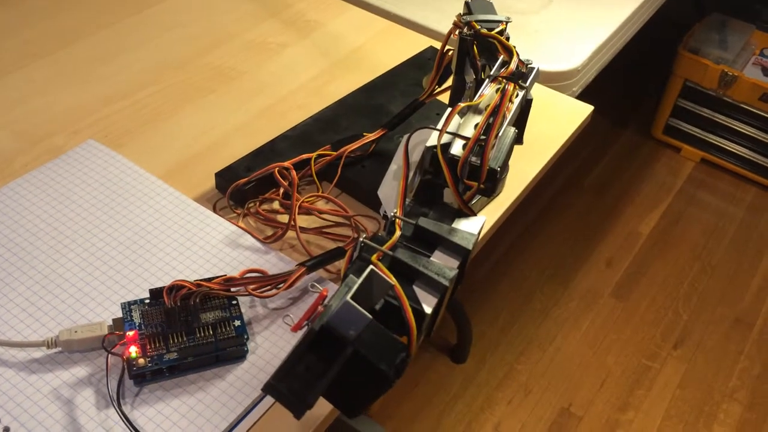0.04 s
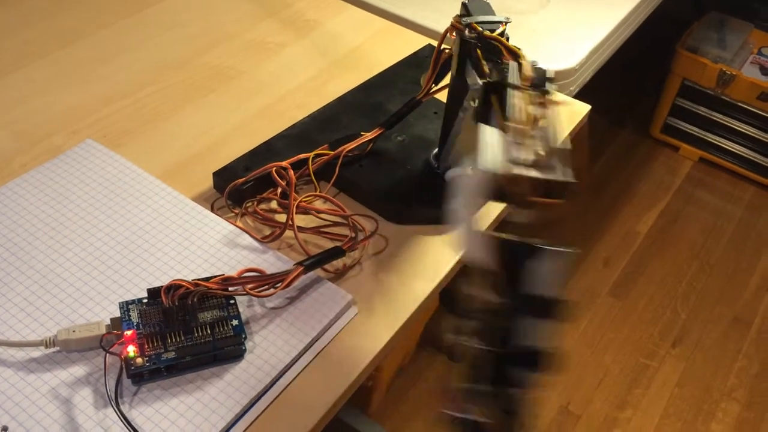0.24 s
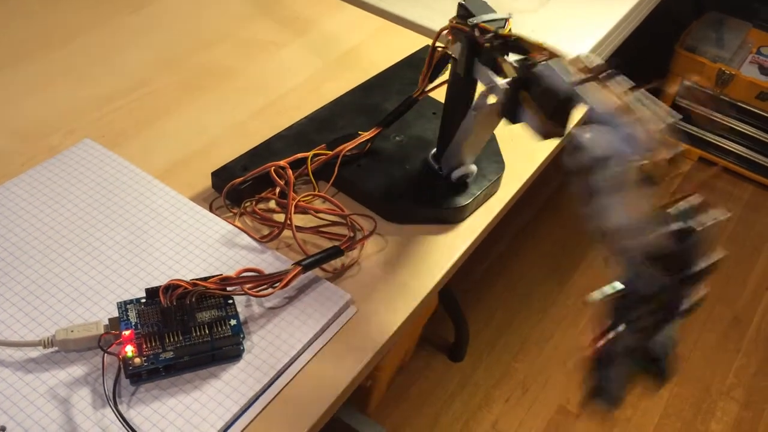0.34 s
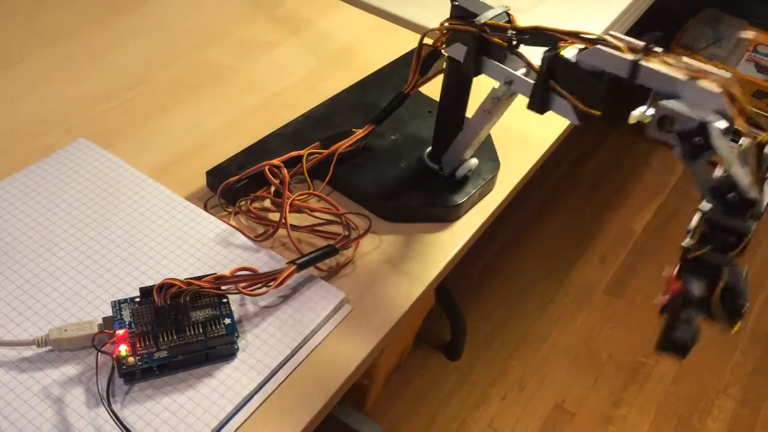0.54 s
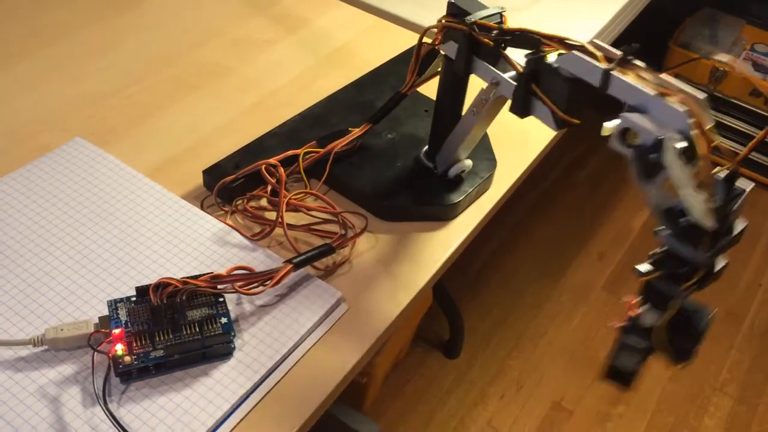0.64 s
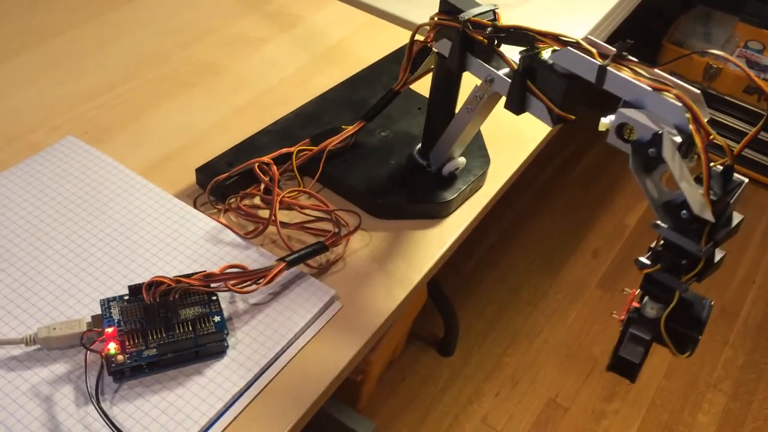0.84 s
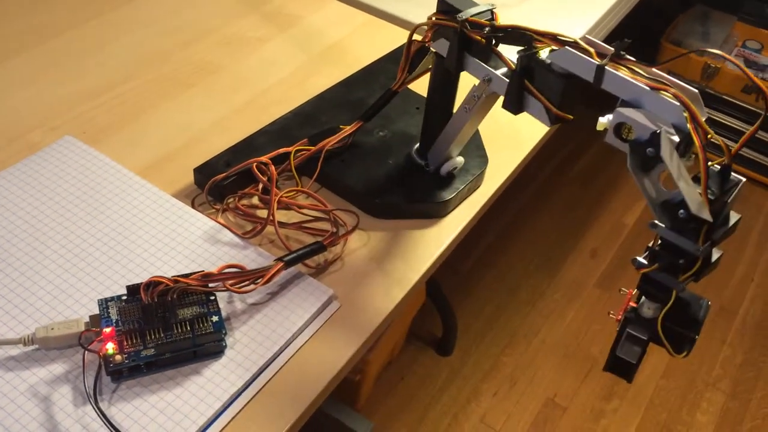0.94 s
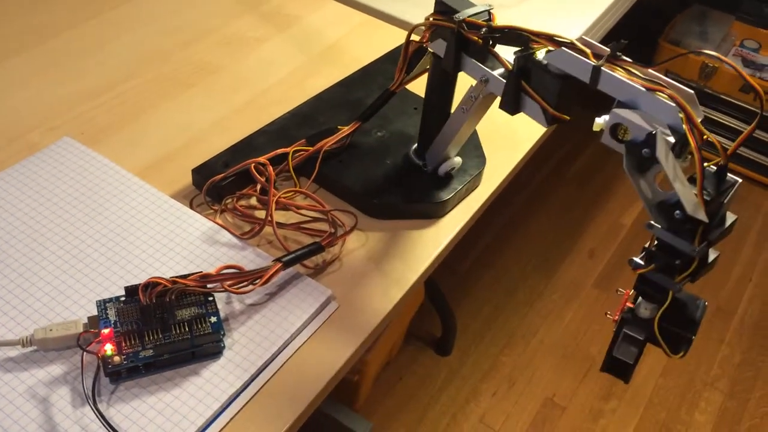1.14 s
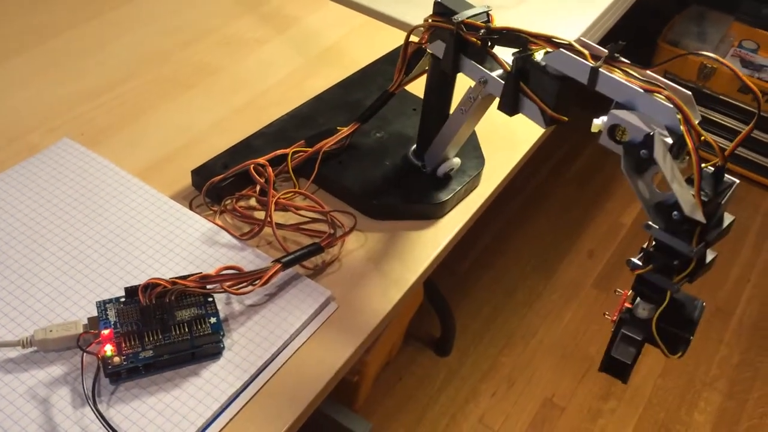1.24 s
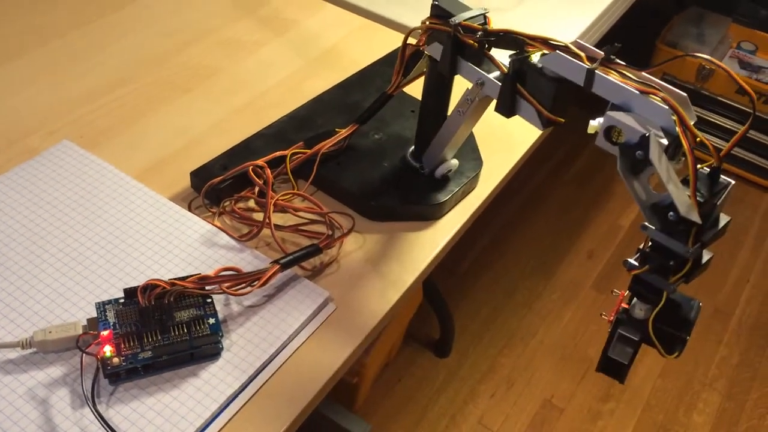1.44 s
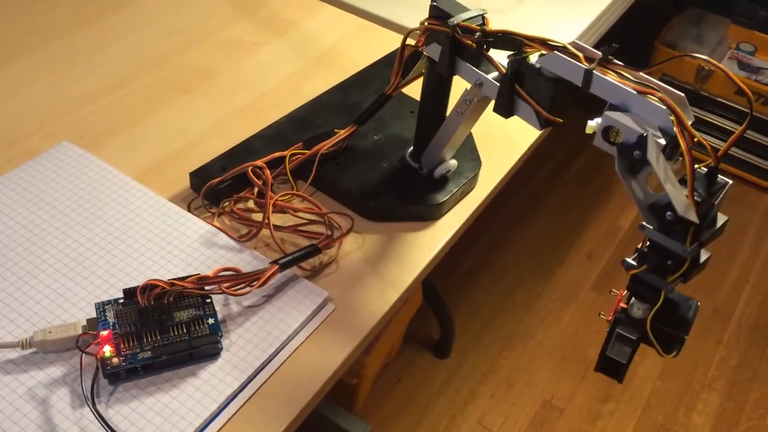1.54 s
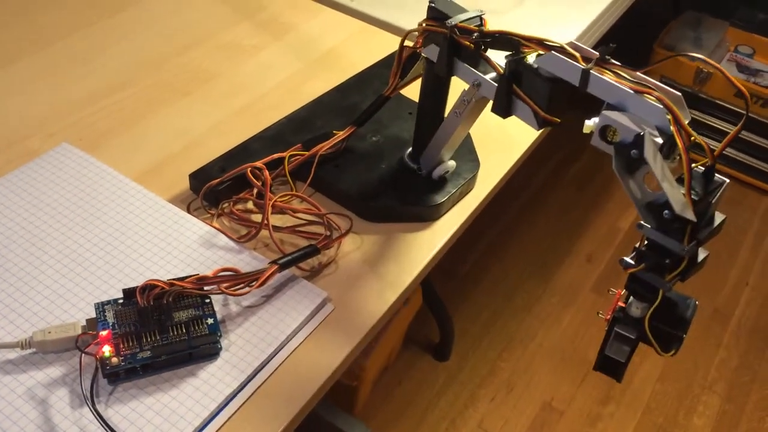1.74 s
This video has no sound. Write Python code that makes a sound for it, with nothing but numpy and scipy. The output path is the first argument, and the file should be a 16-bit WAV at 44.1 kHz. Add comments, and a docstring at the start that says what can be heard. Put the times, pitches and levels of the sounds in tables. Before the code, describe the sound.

A small robot arm's servos whine briefly, then it thuds to a stop and ticks.

```python
"""A faint buzz over two low hums and room hiss, then hobby servos swing a small plastic robot arm.
Gear teeth hiss and whine, slack knocks in the arm and a faster joint chirps up.
The arm stops with a thud through the wooden desk and settles with a few ticks.
The servos then hold their pose, buzzing as each control pulse nudges the motors."""
import sys
import numpy as np
from scipy import signal
from scipy.fft import rfft, irfft, next_fast_len
from scipy.io import wavfile
from scipy.ndimage import uniform_filter1d

SR = 44100
rng = np.random.default_rng(int(sys.argv[2]) if len(sys.argv) > 2 else 0)


def dump_mix(stems):
    """Bounce the given channels to the path in sys.argv[1] as a 16-bit WAV at rate SR."""
    frames = np.atleast_2d(stems).T  # one column per channel
    limited = np.clip(frames, -1, 1)  # hard clip at full scale
    pcm = np.round(limited * 32767).astype(np.int16)
    wavfile.write(sys.argv[1], SR, pcm)


N = 79380
TIME_S = np.arange(N) / SR


def amp(db):
    return 10 ** (np.asarray(db, float) / 20)


def unit_rms(x):
    return x / np.sqrt(np.mean(x ** 2) + 1e-20)


def curve(table, column=1):
    return np.interp(TIME_S, [row[0] for row in table], [row[column] for row in table])


def gate(table):
    return (TIME_S > table[0][0]) * (TIME_S < table[-1][0])


def butter(x, order, hz, kind):
    return signal.sosfilt(signal.butter(order, hz, kind, fs=SR, output="sos"), x)


def coloured(x, spectrum):
    """Filters by (freq_hz, gain_db) points on a log-frequency axis."""
    freq_hz, gain_db = np.transpose(spectrum)
    size = next_fast_len(len(x))
    bin_hz = np.fft.rfftfreq(size, 1 / SR)
    gain = amp(np.interp(np.log(bin_hz + 1), np.log(freq_hz + 1), gain_db))
    return irfft(rfft(x, size) * gain, size)[:len(x)]


def resonate(x, hz, width_hz):
    """Unity-gain resonance; hz may glide."""
    carrier = np.exp(2j * np.pi * np.cumsum(hz * np.ones(len(x))) / SR)
    pole = np.exp(-np.pi * width_hz / SR)
    return 2 * (carrier * signal.lfilter([1 - pole], [1, -pole], x / carrier)).real


def band(x, hz, width_hz):
    """Two resonances in series, at unit RMS."""
    return unit_rms(resonate(resonate(x, hz, width_hz), hz, width_hz))


def drift(rate_hz):
    """Smooth noise that changes about rate_hz times a second."""
    size = max(int(SR / rate_hz), 2)
    return unit_rms(uniform_filter1d(uniform_filter1d(rng.standard_normal(N), size), size))


def add(mix, start_s, sound):
    part = mix[round(start_s * SR):][:len(sound)]
    part += sound[:len(part)]


def struck(events, modes, rattle_s, push_s):
    """Each blow, a push followed by a brief rattle, rings the same modes."""
    t, out = TIME_S[:SR // 2], np.zeros(N)
    ring = sum(amp(db - 60 * t / t60_s) * np.sin(2 * np.pi * hz * t) for hz, db, t60_s in modes)
    ring = np.convolve(ring, np.hanning(max(int(push_s * SR), 3)))[:len(t)]
    for start_s, level_db in events:
        rattle = rng.standard_normal(900) * np.exp(-t[:900] / rattle_s) / np.sqrt(rattle_s * SR)
        sound = signal.fftconvolve(ring, signal.unit_impulse(900) + rattle)
        add(out, start_s, amp(level_db) * sound / abs(sound).max())
    return out


# Hum levels: time_s, low_hum_db, high_hum_db
HUM_LEVELS = [(0, -60.5, -65), (.2, -63.5, -63), (.5, -61, -63), (.7, -60.5, -59.5), (.9, -61, -66.5),
              (1.15, -61, -71), (1.4, -63, -61), (1.8, -59, -63)]
# Room noise spectrum: freq_hz, gain_db
AIR_SPECTRUM = [(12, -61), (20, -25), (49, -0.5), (78, -31.5), (109, -4), (170, -15), (312, -23),
                (897, -26.5), (1480, -31), (1750, -31), (3910, -34.5), (4370, -38), (15200, -45.5)]
def background(low_hum_hz=99.0, high_hum_hz=119.1, air_db=-65):
    """Two hums swell, fade and beat over the hiss of the room."""
    hums = np.zeros(N)
    for column, hz in ((1, low_hum_hz), (2, high_hum_hz)):
        tone = np.sqrt(2) * np.sin(2 * np.pi * (hz * TIME_S + rng.random()))
        hums += amp(curve(HUM_LEVELS, column)) * tone
    return hums + amp(air_db) * unit_rms(coloured(rng.standard_normal(N), AIR_SPECTRUM))


# Desk rumble: time_s, level_db
RUMBLE_LEVELS = [(0, -67.5), (.2, -69), (.55, -61), (.8, -68), (.9, -68), (1.1, -65.5), (1.2, -76),
                 (1.8, -67.5)]
def desk_rumble():
    """A low rumble comes and goes."""
    return amp(curve(RUMBLE_LEVELS)) * band(rng.standard_normal(N), hz=167, width_hz=160)


# Holding buzz: time_s, level_db
HOLD_LEVELS = [(0, -77), (.2, -89), (.7, -75), (.85, -79), (1.1, -80.5), (1.25, -84), (1.8, -82.5)]
# Resonances of a nudged motor: freq_hz, width_hz, gain_db
NUDGE_BANDS = [(1450, 260, 1), (3100, 1000, -5), (4400, 800, -3), (6600, 1800, -7)]
# Strain before the move: pitch_hz, width_hz, level_db, end_s
STRAIN_WHINE = (5900, 700, -76, .2)
def holding_servos(pulse_hz=51.67, first_pulse_s=.0148, nudge_s=.0026, spread_db=1.0):
    """Each control pulse briefly nudges the motors; they whine with strain before the move."""
    cycles = (TIME_S - first_pulse_s) * pulse_hz + 1
    age = cycles % 1 / pulse_hz / nudge_s
    strength = amp(spread_db * rng.standard_normal(N // 500))[cycles.astype(int)]
    nudges = age * np.exp(1 - age ** 2) * strength * rng.standard_normal(N)
    buzz = sum(amp(db) * band(nudges, hz, width_hz) for hz, width_hz, db in NUDGE_BANDS)
    pitch_hz, width_hz, level_db, end_s = STRAIN_WHINE
    strain = unit_rms(nudges) + 3.7 * rng.standard_normal(N)
    whine = unit_rms(resonate(strain, pitch_hz, width_hz))
    return amp(curve(HOLD_LEVELS)) * buzz + amp(level_db) * (TIME_S < end_s) * whine


# Gear trains in the swing: time_s, level_db, treble_relative_db, bracket_relative_db
GEAR_LEVELS = [(0.205, -82, 1, -17), (0.215, -48, -13, -6.5), (0.241, -42.5, 2.5, -26),
               (0.289, -41, -1.5, -3.5), (0.309, -41, 12, -27.5), (0.351, -41, 10, -8),
               (0.367, -43, 0.5, -15.5), (0.389, -43.5, 7.5, -7), (0.409, -42.5, 4, -9.5),
               (0.477, -45.5, 4.5, -7), (0.555, -49, 0, -40), (0.569, -53.5, -0.5, -34),
               (0.631, -76.5, 3, 4), (0.677, -67, -3.5, -14), (0.837, -80.5, -25, 7),
               (0.915, -88.5, 6, 7.5), (0.93, -73, 0, -1)]
# Tooth rattle spectrum: freq_hz, gain_db
TOOTH_SPECTRUM = [(300, -47), (900, -15.5), (1300, -31), (1800, -15.5), (2400, -10.5), (3600, -8),
                  (4500, -4), (6700, -3.5), (10000, -5.5), (15300, -8)]
# Casing resonances: freq_hz, width_hz, gain_db
CASING_BANDS = [(2182, 200, -22.5), (4276, 400, -33.5), (6605, 290, -17.5)]
def gear_hiss(teeth_per_s=9000, tooth_spread_db=1.5, flutter_db=1, crossover_hz=7300):
    """Dense uneven tooth clicks ring the casing and a bracket; the treble has its own level."""
    clicks = rng.standard_normal(N) * amp(tooth_spread_db * rng.exponential(1, N))
    clicks *= rng.random(N) < teeth_per_s / SR
    clicks = unit_rms(clicks) * amp(flutter_db * drift(75))
    casing = sum(amp(db) * band(clicks, hz, width_hz) for hz, width_hz, db in CASING_BANDS)
    body = unit_rms(coloured(clicks, TOOTH_SPECTRUM)) + casing
    low = unit_rms(butter(body, 4, crossover_hz, "low"))
    treble = amp(curve(GEAR_LEVELS, 2)) * unit_rms(butter(body, 4, crossover_hz, "high"))
    bracket = amp(curve(GEAR_LEVELS, 3)) * band(clicks, hz=1400, width_hz=200)
    fade_out = np.clip((GEAR_LEVELS[-1][0] - TIME_S) * 20, 0, 1)
    return gate(GEAR_LEVELS) * fade_out * amp(curve(GEAR_LEVELS)) * (low + treble + bracket)


# Base motor and braking whines: time_s, tooth_rate_hz, level_db
BASE_GLIDE = [(.215, 1650, -62), (.25, 1780, -53), (.29, 1950, -54), (.33, 2250, -50), (.38, 2180, -54),
              (.43, 2230, -52), (.46, 1900, -59), (.48, 1700, -72)]
BRAKE_GLIDE = [(.548, 1950, -64), (.555, 1850, -53), (.565, 1620, -52), (.573, 1570, -57),
               (.585, 1620, -70)]
# Their harmonics: multiple, gain_db
BASE_HARMONICS = [(1, -6.5), (2, 5.5), (3, -4.5)]
BRAKE_HARMONICS = [(2, -1), (3, 0)]
def mesh_whine(glide, harmonics, blur_hz):
    """Harmonics of the tooth rate, each a fuzzy whistle from uneven teeth."""
    tooth_hz = curve(glide)
    whistles = sum(amp(db) * band(rng.standard_normal(N), k * tooth_hz, blur_hz) for k, db in harmonics)
    return gate(glide) * amp(curve(glide, 2)) * whistles


# Motor shake in the desk: time_s, level_db
GROWL_LEVELS = [(.22, -53), (.255, -78), (.275, -52), (.3, -59.5), (.35, -51.5), (.4, -60.5), (.44, -66)]
def motor_growl():
    """The base motor shakes a low resonance of the desk."""
    shake = band(rng.standard_normal(N), hz=129, width_hz=14)
    return gate(GROWL_LEVELS) * amp(curve(GROWL_LEVELS)) * shake


# Knocks in the arm: start_s, level_db
SLACK_KNOCKS = [(.221, -53), (.246, -27.5), (.258, -48), (.274, -31.5), (.283, -34), (.569, -45)]
# Arm modes: freq_hz, gain_db, t60_s
ARM_MODES = [(640, -18, .025), (800, -11, .035), (990, -3, .035), (1200, -6, .025), (1390, 0, .04),
             (1620, -5, .025)]
def arm_knocks():
    """The plastic arm rings as its slack is taken up."""
    knocks = struck(SLACK_KNOCKS, ARM_MODES, rattle_s=.0027, push_s=.0003)
    return butter(knocks, 2, hz=600, kind="high")


# Fast joint chirp: time_s, tooth_rate_hz, level_db
FAST_GLIDE = [(.3, 2250, -56), (.31, 2420, -38), (.319, 2598, -36), (.329, 2809, -37), (.341, 3010, -33),
              (.349, 3048, -32), (.357, 3065, -33), (.366, 3075, -39), (.374, 3075, -56)]
# Its casing response: freq_hz, gain_db
FAST_CASING = [(2500, -20), (5000, -10), (6200, -9), (7800, -4), (9200, 0), (10200, -1), (12000, -7),
               (15300, -14)]
def fast_joint(wobble_hz=12, flutter_db=1.8, rasp_db=-3):
    """A light joint spins up: regular tooth pulses and a rasp, both coloured by its casing."""
    cycles = np.cumsum(curve(FAST_GLIDE) + wobble_hz * drift(400)) / SR
    teeth = sum(amp(flutter_db * drift(170)) * np.cos(2 * np.pi * k * cycles) for k in range(1, 6))
    rasp = amp(rasp_db) * rng.standard_normal(N) * (1 + np.cos(2 * np.pi * cycles))
    return gate(FAST_GLIDE) * amp(curve(FAST_GLIDE, 2)) * coloured(teeth + rasp, FAST_CASING)


# Jolts of the base: start_s, level_db
BASE_JOLTS = [(.4435, -22.5), (.459, -27.5), (.473, -35), (.489, -49), (.504, -29), (.527, -48), (.6, -65),
              (.67, -60)]
# Desk modes: freq_hz, gain_db, t60_s
DESK_MODES = [(82, -13, .6), (129, 0, .15), (167, -5, .13), (200, -1, .14), (255, -19, .1), (310, -15, .12),
              (410, -10, .09), (480, -14, .08), (600, -17, .06), (800, -19, .05), (980, -19, .05)]
def desk_thuds():
    """The base jolts the wooden desk as the arm stops."""
    return struck(BASE_JOLTS, DESK_MODES, rattle_s=.0024, push_s=.0023)


# Joint ticks: start_s, level_db, pitch_hz
JOINT_TICKS = [(.604, -49, 10000), (.665, -50, 9200), (.684, -52, 5500), (.714, -54, 5500),
               (.737, -54, 8300), (.7455, -53, 7000), (.929, -58, 7200), (1.1186, -50, 11000)]
# Snap spectrum: freq_hz, gain_db
SNAP_SPECTRUM = [(1500, -24), (3300, -1), (5000, -5), (7500, -2), (11000, 0), (15000, -7)]
def settling_ticks(t60_s=.025, ring_db=-5):
    """The joints settle with short bright snaps, each ringing at its own pitch."""
    t, out = TIME_S[:2000], np.zeros(N)
    for start_s, level_db, pitch_hz in JOINT_TICKS:
        snap = unit_rms(coloured(rng.standard_normal(len(t)), SNAP_SPECTRUM))
        ring = amp(ring_db) * unit_rms(resonate(snap, pitch_hz, width_hz=1200))
        tick = (snap + ring) * amp(-60 * t / t60_s)
        add(out, start_s, amp(level_db) * tick / abs(tick).max())
    return out


def room_tail(x, t60_s=.4, gain_db=-13, gap_s=.004):
    """Scattered reflections leave a short, duller tail."""
    t = TIME_S[:SR // 2]
    reflections = rng.choice([-1., 1.], len(t)) * (rng.random(len(t)) < .1)
    tail = reflections * amp(-60 * t / t60_s) * (t > gap_s)
    tail = coloured(tail, [(100, 0), (4000, 0), (15000, -4)])
    return amp(gain_db) * signal.fftconvolve(x, tail / np.linalg.norm(tail))[:N]


def scene():
    """Arm and its reflections, desk and background, in mono."""
    arm = gear_hiss()
    arm += mesh_whine(BASE_GLIDE, BASE_HARMONICS, blur_hz=420)
    arm += mesh_whine(BRAKE_GLIDE, BRAKE_HARMONICS, blur_hz=90)
    arm += arm_knocks() + fast_joint() + settling_ticks() + holding_servos()
    reflections = room_tail(arm)
    desk = motor_growl() + desk_rumble() + desk_thuds()
    return (arm + reflections + desk + background())[None]


def record(dry):
    """A small microphone drops the deepest bass; the top treble is cut off steeply."""
    thin = butter(dry, 2, hz=55, kind="high")
    lowpass = signal.firwin(1023, cutoff=15385, window=("kaiser", 10), fs=SR)
    return signal.oaconvolve(thin, lowpass[None], "same")


dry = scene()
out = record(dry)
dump_mix(out)
```